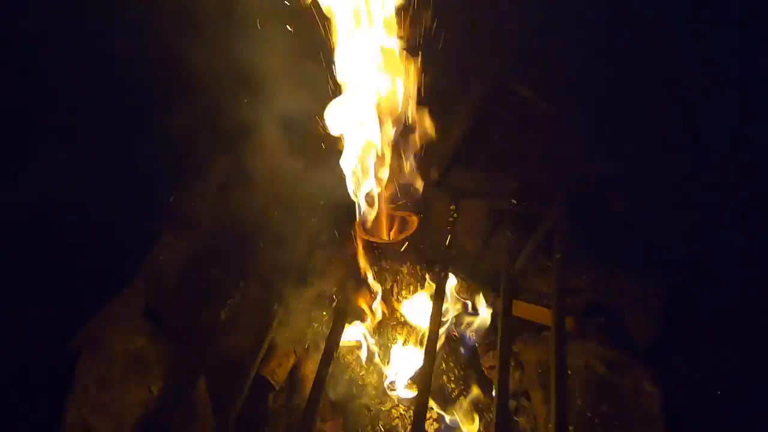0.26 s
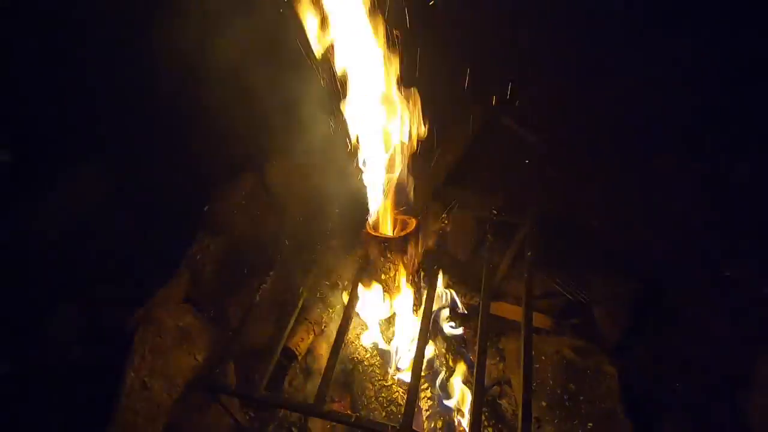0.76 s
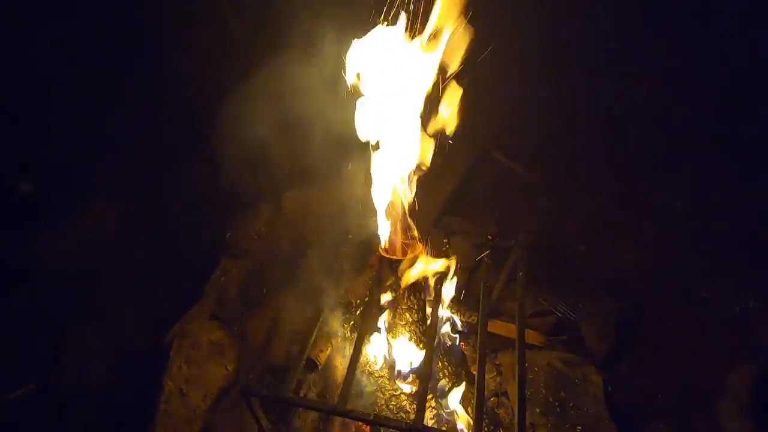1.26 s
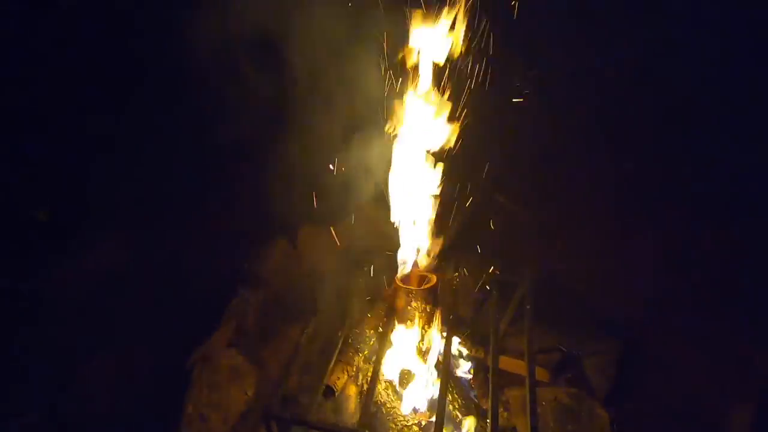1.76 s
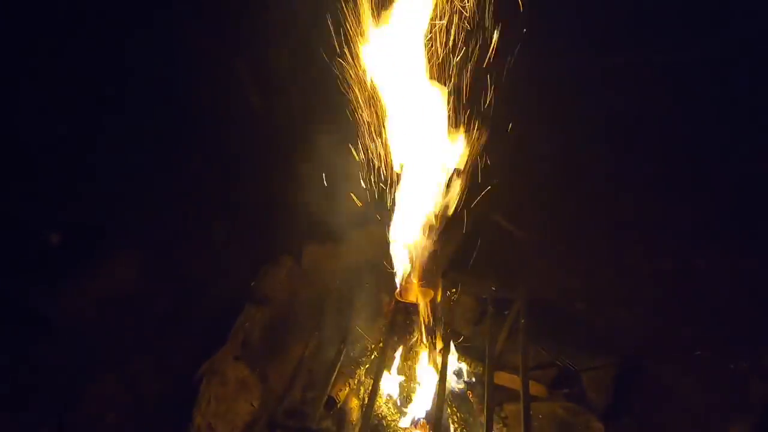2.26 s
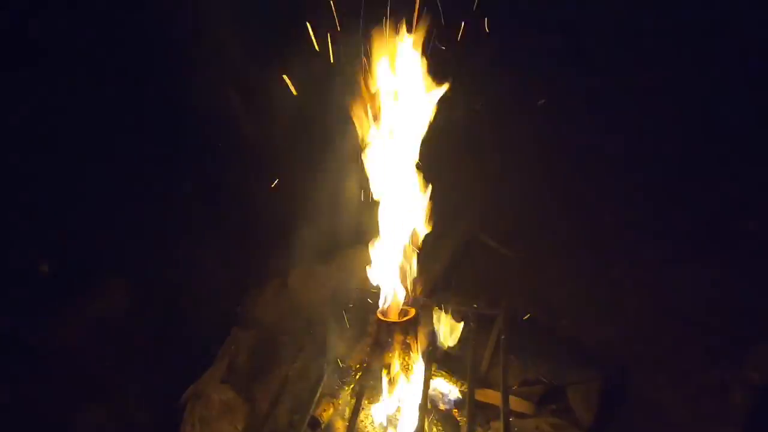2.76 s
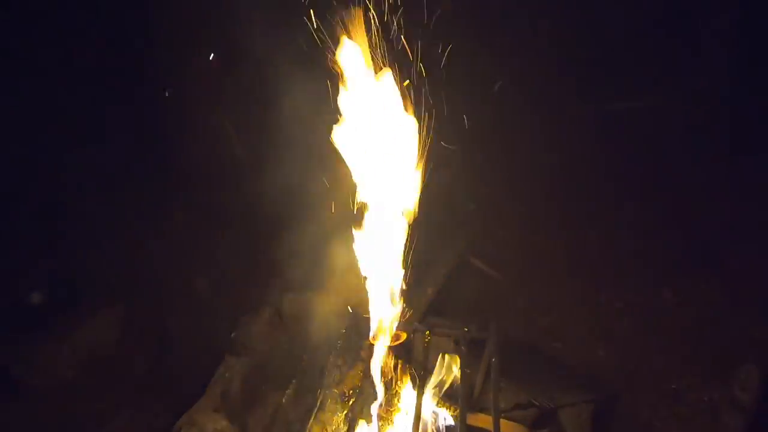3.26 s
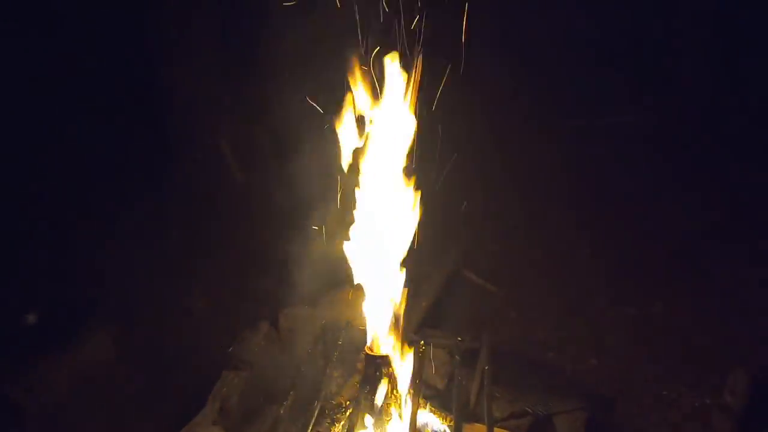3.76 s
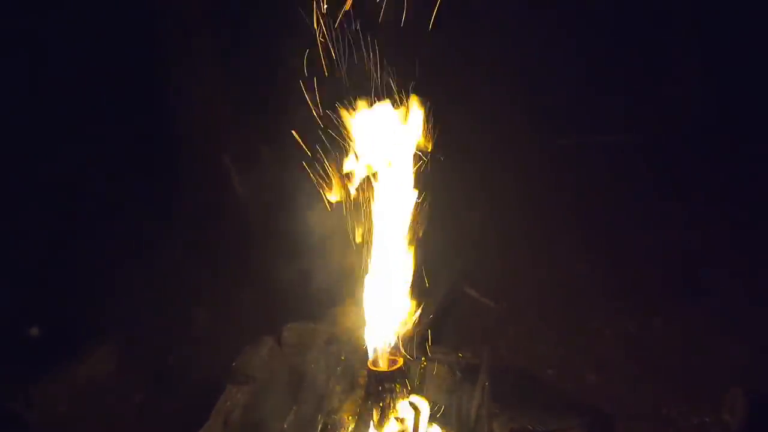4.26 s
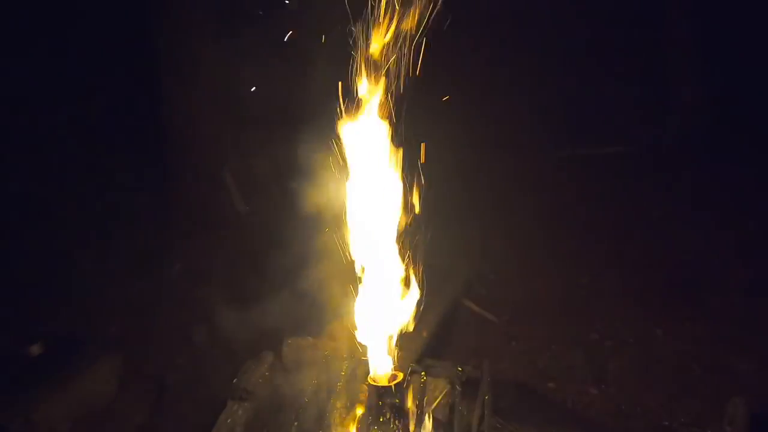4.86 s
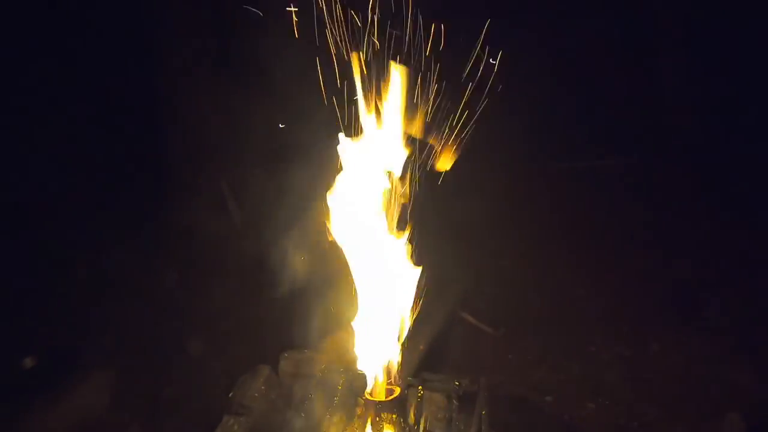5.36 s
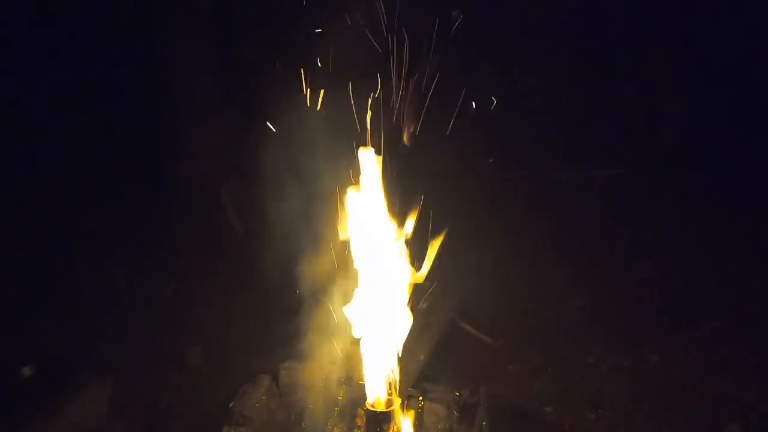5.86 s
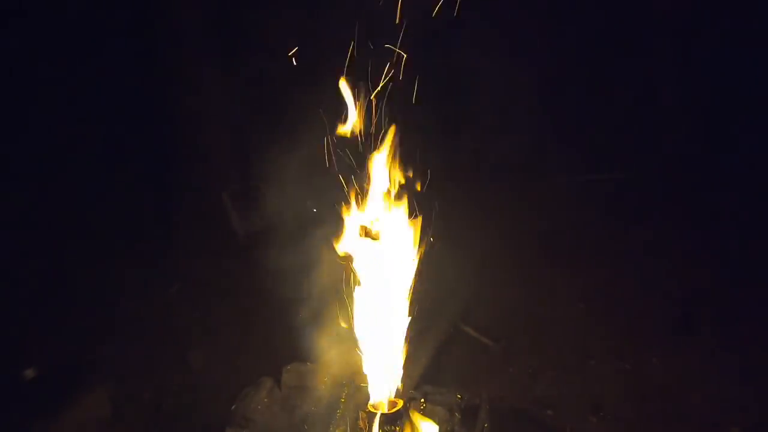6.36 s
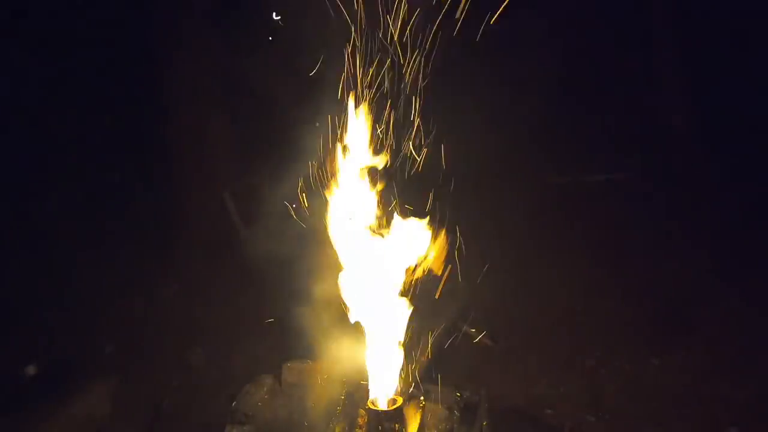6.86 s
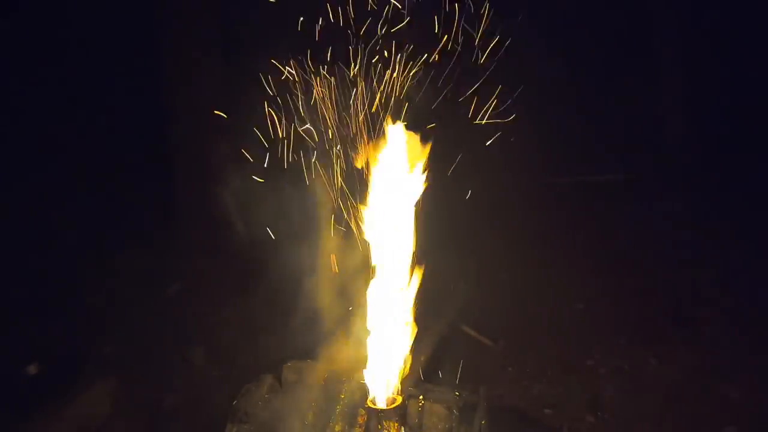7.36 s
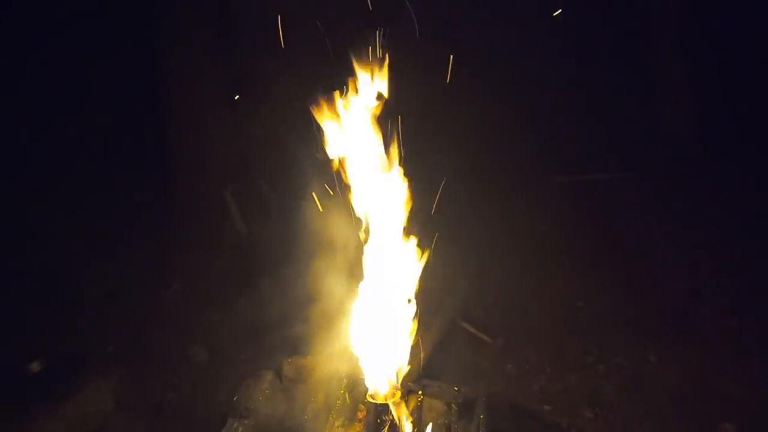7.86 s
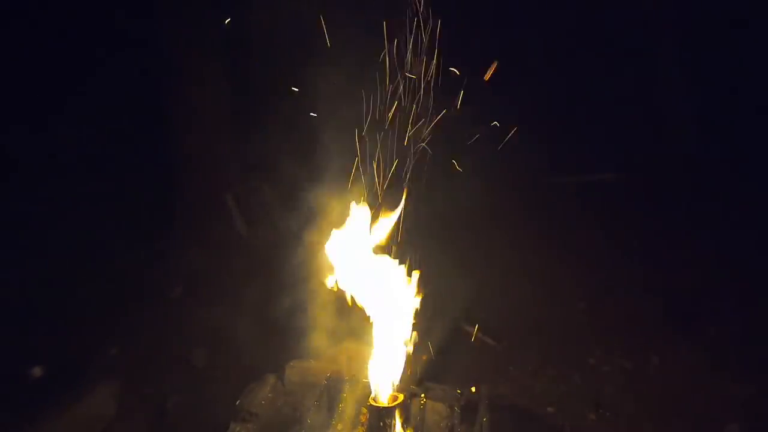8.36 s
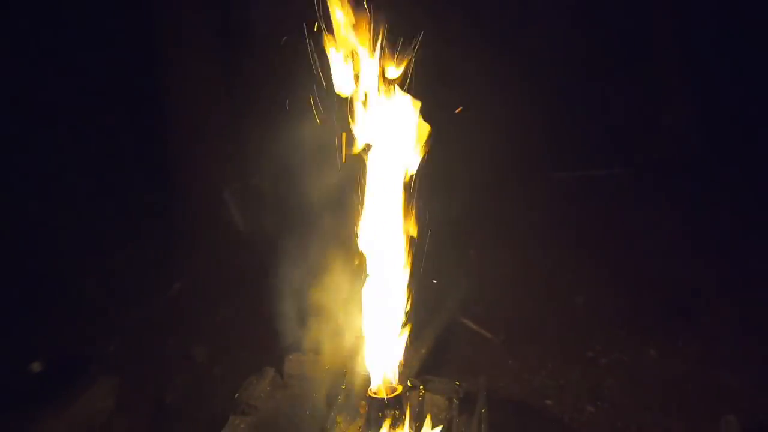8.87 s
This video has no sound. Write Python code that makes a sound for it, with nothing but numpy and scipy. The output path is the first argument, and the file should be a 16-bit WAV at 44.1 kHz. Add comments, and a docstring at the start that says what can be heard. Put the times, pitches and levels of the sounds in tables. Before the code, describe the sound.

A hollow stump burns in a stone-ringed pit at night, heard by a stereo microphone a few metres away for about nine seconds. From the start, hard snaps and pops fly irregularly over dense tiny ticks, especially thick from 0.4 to 1.4. Each large crack is instantaneous, rattles briefly off stones, knocks the wood and leaves a soft hissy tail from trees under half a second long. Heavy cracks stand out near 1.4, 1.9, 3.1 and 3.9, some with a short hollow thump. The low flue rush and deep flutter gust strongly until about 2, then recede, surging briefly at 4.1. Pops continue, clustering at 6.4 to 7.0 and around 7.6, then grow sparse and weaker from 8 to 8.4, with a bright snap near 9.05. Faint distant crickets and steady night air remain behind; the fire drifts slightly rightward.

```python
"""At a stone-ringed pit at night a hollow stump burns, heard from a few metres by a stereo microphone.
Sap pockets burst as sharp cracks: single pressure clicks that rattle between the stones, knock the
ringing wood and come back from the trees as a soft tail of noise. Puffs of gas thump in the hollow.
The flame column rushes low like a flue, as coloured noise in gusts; a far chorus of crickets chirrs
as pulsed tones, over the steady noise of still night air."""
import sys
import numpy as np
from scipy import signal
from scipy.fft import rfft, irfft, next_fast_len
from scipy.io import wavfile

SR = 44100
rng = np.random.default_rng(int(sys.argv[2]) if len(sys.argv) > 2 else 0)


def unload_wav(signal):
    """Save mono or channel-first audio to the path in sys.argv[1] as 16-bit WAV at rate SR, clipped to [-1, 1]."""
    wavfile.write(
        sys.argv[1],
        SR,
        np.round(np.clip(np.atleast_2d(signal).T, -1, 1) * 32767).astype(np.int16),
    )


N = 402191
SIZE = next_fast_len(N + SR)   # a second of room behind the scene keeps FFT tails from wrapping round
HZ = np.maximum(np.arange(SIZE // 2 + 1) * SR / SIZE, 10)


def amp(db):
    """dB to gain."""
    return 10 ** (np.asarray(db) / 20)


def rms_one(x):
    """Scale to rms 1, over both channels together."""
    return x / np.sqrt(np.mean(x ** 2) + 1e-20)


def at_hz(points, hz, column=1):
    """Read a table on a log-frequency axis."""
    points = np.array(points)
    return np.interp(np.log(hz), np.log(points[:, 0]), points[:, column])


def causal(db):
    """Minimum-phase response for a dB curve on the FFT grid: nothing sounds before the crack."""
    cepstrum = irfft(db * np.log(10) / 20, SIZE)
    cepstrum[1:SIZE // 2] *= 2
    cepstrum[SIZE // 2 + 1:] = 0
    return np.exp(rfft(cepstrum))


def band(x, low_hz, high_hz):
    """Butterworth band-pass."""
    sos = signal.butter(2, [low_hz, high_hz], "band", fs=SR, output="sos")
    return signal.sosfilt(sos, x + 1e-18)


def drift(rate):
    """Slow chance: random points of spread 1, two per cycle of the rate in Hz, joined by lines."""
    points = rng.standard_normal(600)
    return np.interp(np.arange(N) / SR * 2 * rate, np.arange(600), points)


def diffuse(db, narrower_db=0):
    """Stereo noise of a given colour and rms 1, its side share set by the microphone pair."""
    # Width of sound from all around. Each row: frequency in Hz, side over mid in dB.
    side_over_mid = [(150, -6.5), (380, 1), (950, 4), (2400, -6.5), (6000, -4.5), (15000, 11)]
    mid, side = rfft(rng.standard_normal((2, SIZE))) * amp(db)
    side = side * amp(at_hz(side_over_mid, HZ) - narrower_db)
    return rms_one(irfft(np.array([mid + side, mid - side]), SIZE)[:, :N])


def ring(clicks, hz, t60):
    """A unit click sets a sine ringing from height 1; it dies by 60 dB in t60 seconds."""
    radius, w = amp(-60 / (t60 * SR)), 2 * np.pi * hz / SR
    return signal.lfilter([0, np.sin(w)], [1, -2 * radius * np.cos(w), radius ** 2], clicks + 1e-18)


def flame():
    """The hollow colours the roar; loose eddies flutter below it, a flap lies above; all gust together."""
    # The fire before its gusts. Each row: time in seconds, deep flutter in dB, flue rush in dB.
    fire_levels = [(0, -47, -53.5), (.4, -56.5, -56.5), (.75, -49, -50.5), (.95, -55.5, -58),
                   (1.501, -48.5, -50.5), (2.099, -59.5, -53.5), (2.6, -62.5, -58), (3.98, -70.5, -59.5),
                   (4.121, -55, -51), (4.501, -66.5, -61.5), (6.9, -66.5, -59.5), (7.3, -73.5, -63.5),
                   (9.12, -69, -61)]
    # Colour of the rush through the hollow. Each row: frequency in Hz, relative density in dB per Hz.
    rush_colour = [(90, -58.5), (120, -13.5), (160, -3), (260, -12), (520, -41.5), (800, -55.5)]
    quick_gust_db, slow_swell_db = 2.5, 1   # spreads
    flap_lift_db = 45   # offsets the doubled rush level
    s, *columns = np.transpose(fire_levels)
    flutter_db, rush_db = [np.interp(np.arange(N) / SR, s, column) for column in columns]
    gust_db = quick_gust_db * drift(11) + slow_swell_db * drift(3)

    rush = diffuse(at_hz(rush_colour, HZ), narrower_db=6.5)
    rush = rush * amp(rush_db + gust_db + 2 * drift(31))
    flutter = rms_one(band(diffuse(0 * HZ, narrower_db=7), 33, 90))
    flutter = flutter * amp(flutter_db + 2 * gust_db + 2 * drift(0.57))
    # the flap swings twice as far in dB as the rush, so it stands out in strong gusts
    flap = rms_one(band(diffuse(0 * HZ, narrower_db=6.5), 140, 710))
    flap = flap * amp(2 * rush_db + flap_lift_db + 2 * gust_db)
    return rush + flutter + flap


def crickets():
    """Twelve far singers spread across the stereo, each a pulsed tone of its own pitch and pace."""
    chorus_db, centre_hz, width_hz = -70.5, 4530, 340
    t, chorus = np.arange(N) / SR, 0
    for pitch, (pace, start, side) in zip(np.linspace(-.5, .5, 12), rng.random((12, 3))):
        pulses_per_s = 200 + 40 * pace
        cycles = pulses_per_s * t + start + drift(6) / 2
        pulses = np.maximum(np.sin(2 * np.pi * cycles), 0)
        tone = np.sin(2 * np.pi * (centre_hz + width_hz * pitch) * t + drift(17))
        singer = pulses * tone * amp(2 * drift(3.9))
        chorus = chorus + singer * np.sqrt([[side], [1 - side]])
    return amp(chorus_db) * rms_one(chorus)


def night_air():
    """Still air around the pit: steady coloured noise at full stereo width."""
    # Colour of the night. Each row: frequency in Hz, relative density in dB per Hz.
    night_colour = [(400, -18.5), (850, -0.5), (2800, -10.5), (6000, -5.5), (15000, -45.5)]
    night_db = -69.5
    return amp(night_db) * diffuse(at_hz(night_colour, HZ))


def bursts():
    """All bursts as (sample, gains of body, middle and bright range, tail dB): loud ones and a patter."""
    # Loud bursting pockets.
    # Each row: start in seconds, relative height of the pressure step in dB, treble over middle in dB.
    loud_pops = [(0.0103, -5, -1), (0.1443, -33, 14.0), (0.1858, -19.5, 8), (0.2925, -20, -4),
                 (0.3411, -28, -19), (0.4519, -3, 1), (0.5046, -15.5, 6), (0.5166, -0.5, 6),
                 (0.578, -11, -4), (0.5886, -15, 9), (0.6218, -13.0, -15.5), (0.6729, -13, 3),
                 (0.6904, -5.5, -1.5), (0.7308, -11, -9.5), (0.7701, -12.0, 11), (0.7993, -18.5, 7.5),
                 (0.9461, -13, 5), (0.9752, -4.5, 7), (1.052, -25.5, -7), (1.13, -29, -7),
                 (1.1528, -13.5, -0.5), (1.1823, -13, 8.5), (1.2273, -5.5, -11.5), (1.2397, -4, 6),
                 (1.3756, -6.5, 2), (1.3937, 2, 2), (1.6183, -23.5, -7), (1.6532, -5, -8.5),
                 (1.6582, -8, 0.5), (1.7549, -12.5, -1), (1.8345, -12.5, -4.5), (1.9167, -21.5, -3),
                 (1.9321, 5.5, -8), (2.0949, -17, 0), (2.2399, -3, 9.5), (2.4567, -13, -2.5),
                 (2.6719, -25.5, 15), (2.7108, -3, 4.0), (2.7541, -11.5, 9.5), (2.7901, -0.5, 5),
                 (2.82, -13.5, 2.5), (2.9602, -23.5, 7.0), (3.0456, -12.5, -3), (3.1075, 0, -0.5),
                 (3.2295, -14, 3.5), (3.3541, -19, -0.5), (3.4537, -5.5, 0), (3.7175, -24.5, -0.5),
                 (3.7584, -16.5, -8.5), (3.8082, -7.5, -12.5), (3.8284, -15.0, -6), (3.9009, 2.0, 1.5),
                 (4.0145, -7.5, 1), (4.1229, -10, 9.5), (4.1365, -10, -5), (4.2108, -11, 5.5),
                 (4.3025, -15, -0.5), (4.3254, -7, 5), (4.4444, -12.5, 3), (4.568, -19.5, 2.5),
                 (4.5809, -15, -4.5), (4.7707, -12.0, 3), (4.8098, -12.5, 1.5), (4.8312, -14.0, -3.5),
                 (4.8658, -21, 6), (4.9096, -20.5, 1.5), (5.0146, -3, -3), (5.1113, -19.5, 1.0),
                 (5.2872, -19.5, 5), (5.3124, -25, 9.5), (5.3403, -19.5, 5.5), (5.4286, -28, -9),
                 (5.4996, -11, 5.5), (5.5957, -13, 6.0), (5.7245, -15, 6.5), (5.7504, -22.5, -3.0),
                 (5.879, -31.5, 2.5), (5.9602, -13, 4), (5.9841, -8.5, 2), (6.109, -18.5, 1),
                 (6.1592, -7.5, -15.5), (6.2893, -31, -24), (6.3195, -7.5, -4), (6.4276, -1.5, -7),
                 (6.4405, -9.5, -18), (6.4709, -17.5, 6), (6.5176, -17, 8), (6.7155, -3.5, 2.5),
                 (6.8318, -7.5, 5.0), (6.8707, -3.5, 2), (6.9648, -8.5, 1), (7.0027, -6.5, 2.5),
                 (7.1249, -18.5, 0), (7.4463, -33.5, 6.5), (7.4734, -23.5, 3.5), (7.5596, -7.5, 0.5),
                 (7.5685, -3.5, 10), (7.642, -4.0, 7), (7.7926, -11.5, -1.5), (7.8544, -8.5, 2),
                 (7.9167, -12.5, -14), (7.9291, -24, 11.5), (8.2406, -42.5, 14), (8.3011, -28.5, -1),
                 (8.3202, -34.5, 9.0), (8.353, -30, 5), (8.4141, -17.5, -2.5), (8.4516, -16.5, 7),
                 (8.4815, -25, -4), (8.5435, -9, 7.5), (8.6189, -11, 2), (8.7218, -24, 5),
                 (8.7417, -34.5, 16), (8.8275, -38.5, 16), (9.0497, -7.5, 10), (9.0808, -19.0, 2)]
    ticks_per_s, tick_floor_db, tick_spread_db, tick_fade_db_per_s = 50, -45, 5, 0.9
    tick_treble_db, tick_treble_spread_db = 1.5, 7
    body_db, body_per_treble = 5, -.6   # a dull burst sounds full, a bright one thin
    tail_per_treble, tail_spread_db = -.1, 2.5   # bright bursts leave a little less tail; chance varies it

    small = np.flatnonzero(rng.random(N) < ticks_per_s / SR) / SR
    size, colour = rng.standard_normal((len(small), 2)).T
    tick_db = tick_floor_db - tick_fade_db_per_s * small
    tick_db = tick_db + tick_spread_db * np.minimum(np.abs(size), 2)
    ticks = np.c_[small, tick_db, tick_treble_db + tick_treble_spread_db * colour]

    s, step_db, treble_db = np.r_[loud_pops, ticks].T
    gains = amp(step_db + np.array([body_db + body_per_treble * treble_db, 0 * s, treble_db]))
    tail_db = tail_per_treble * treble_db + tail_spread_db * rng.standard_normal(len(s))
    return (s * SR).astype(int), gains.T, tail_db


def cracks(at, gains):
    """Each burst is one pressure click, a short rattle off the nearest stones and a quick dying scatter."""
    # Colour of a crack. Each row: frequency in Hz, relative density in dB per Hz.
    pop_colour = [(150, -50), (300, -6), (520, -12), (1070, -1.5), (2900, 4), (3600, 7), (4500, 0.5),
                  (7600, -2.5), (10000, -15.5), (16500, -29.5)]
    # Lean of the cracks to one side. Each row: frequency in Hz, left over right in dB.
    crack_lean = [(330, 0), (800, -5), (2400, -1), (4500, -2), (9000, 1)]
    rattle_db, rattle_t60_s = -17.5, 0.016   # levels relative to the click
    stones_db, stones_t60_s = -40.5, 0.12
    body_hz, bright_hz = 1420, 4330   # crossovers of the three ranges

    t = np.arange(1600) / SR
    shape = amp(rattle_db - 60 * t / rattle_t60_s) + amp(stones_db - 60 * t / stones_t60_s)
    # short waves reach the two ports by different paths: shares for body, middle, bright
    unlike = np.array([.2, .25, 1.3])[:, None, None]
    trains = np.zeros((3, 2, N + len(t)))
    for i, gain in zip(at, gains):
        shared, left, right = rng.standard_normal((3, len(t))) * shape
        shared[0] = -1   # the click itself
        rattle = shared + unlike * np.array([left, right])
        trains[:, :, i:i + len(t)] += gain[:, None, None] * rattle

    body, middle, bright = trains[:, :, :N] + 1e-18
    below_body, below_bright = [signal.butter(1, hz, fs=SR) for hz in (body_hz, bright_hz)]
    extra_body = signal.lfilter(*below_body, body - middle)
    extra_bright = bright - middle - signal.lfilter(*below_bright, bright - middle)
    mixed = middle + extra_body + extra_bright
    colour_db, lean_db = at_hz(pop_colour, HZ), at_hz(crack_lean, HZ)
    ports = [causal(colour_db + side * lean_db / 2) for side in (1, -1)]
    return irfft(rfft(mixed, SIZE) * ports, SIZE)[:, :N]


def wood(at, gains):
    """Every burst knocks the wall of the stump, each mode with a strength of its own."""
    # Ringing modes of the hollow wall.
    # Each row: frequency in Hz, level relative to the burst in dB, 60 dB decay in seconds.
    wall_modes = [(624, -49, .05), (760, -48, .05), (900, -45, .06), (980, -42, 0.08), (1040, -42, .08),
                  (1130, -45, 0.07), (1270, -49, .06)]
    luck, knocks = rng.standard_normal((len(at), len(wall_modes))), 0
    for (hz, level_db, t60), strength in zip(wall_modes, luck.T):
        clicks = np.zeros(N)
        clicks[at] = gains[:, 1] * amp(level_db + 2.5 * strength)
        knocks = knocks + ring(clicks, hz, t60)
    return knocks


def trees(at, gains, tail_db):
    """Scatter from the trees: after each crack a hiss of its colour swells, flickers and dies by bands."""
    # Tail from the trees.
    # Each row: frequency in Hz, 60 dB decay in seconds, relative density in dB per Hz.
    tree_tail = [(490, 0.05, -39), (926, 0.1, -30.5), (2876, 0.43, -32), (4760, 0.53, -37.5),
                 (7800, 0.34, -33.5), (11000, 0.35, -47), (14700, 0.12, -68.5)]
    trees_db = -43
    noise = [diffuse(at_hz(tree_tail, HZ, 2)) for k in range(2)]   # neighbouring bands get unrelated noise
    scatter, swell = 0, np.exp(-1 / (.012 * SR))   # swells with a 12 ms time constant
    for k, low_hz in enumerate(350 * 2 ** np.arange(0, 5.9, .5)):   # half-octave bands
        centre = low_hz * 2 ** .25
        # how much this band follows the body, middle and bright range of the crack
        octave_gap = np.log([centre / 700, centre / 2700, centre / 8000])
        share = np.clip(1 - np.abs(octave_gap / 1.01), .02, 1)
        power = np.zeros(N) + 1e-18
        np.add.at(power, at, (gains ** 2 @ share) / share.sum() * amp(2 * tail_db))
        fade = amp(-120 / (at_hz(tree_tail, centre) * SR))   # power falls by 60 dB in one decay time
        power = signal.lfilter([1 - swell], np.convolve([1, -fade], [1, -swell]), power)
        hiss = band(noise[k % 2], low_hz, min(low_hz * np.sqrt(2), .45 * SR))
        scatter = scatter + hiss * np.sqrt(np.abs(power)) * amp(2 * drift(25))
    return amp(trees_db) * scatter


def thumps():
    """A puff of gas pushes the air in the hollow, which swings a few times and dies."""
    # Gas puffs in the hollow. Each row: start in seconds, push before the band-pass in dB.
    gas_puffs = [(0.452, -20), (1.228, -23), (1.381, -21.5), (1.655, -26.5), (1.837, -24.5), (1.933, -16),
                 (2.457, -18.5), (3.108, -29), (3.454, -28), (3.809, -28.5), (5.015, -41), (5.75, -36.5),
                 (6.159, -23), (6.429, -25.5), (6.834, -29.5), (7.003, -30), (7.917, -34.5)]
    hollow_hz, hollow_t60_s = 183, 0.025
    clicks = np.zeros(N)
    for s, push_db in gas_puffs:
        clicks[int(s * SR)] = amp(push_db)
    return band(ring(clicks, hollow_hz, hollow_t60_s), 120, 600)


def scene():
    """Cracks with their ring and tail, puffs, flame, crickets and the still night air."""
    at, gains, tail_db = bursts()
    # left over right in dB from start to end, as the microphone turns; half to each side
    turn_db = np.linspace(0.5, -2.5, N) / 2
    near = (cracks(at, gains) + wood(at, gains)) * amp([turn_db, -turn_db])
    fire = near + trees(at, gains, tail_db) + thumps() + flame()
    return fire + crickets() + night_air()


def record(dry):
    """The loudest peaks are rounded off softly; the microphone's top is cut steeply."""
    cutoff_hz = 17300
    rounded = dry / (1 + dry ** 4) ** .25
    return signal.sosfilt(signal.cheby2(12, 70, cutoff_hz, fs=SR, output="sos"), rounded)


dry = scene()
out = record(dry)
unload_wav(out)
```